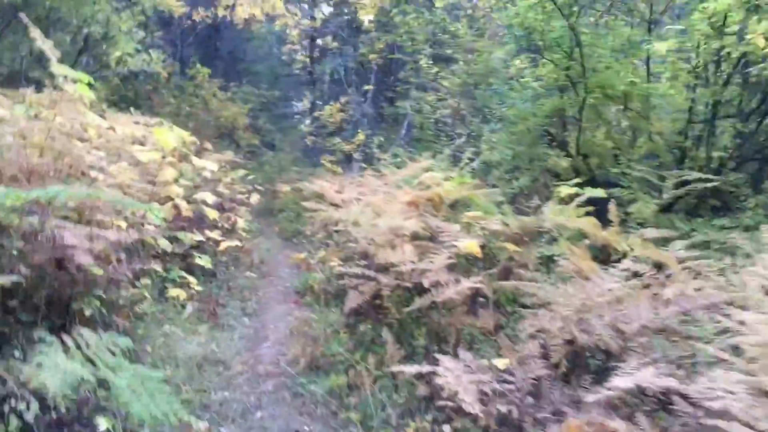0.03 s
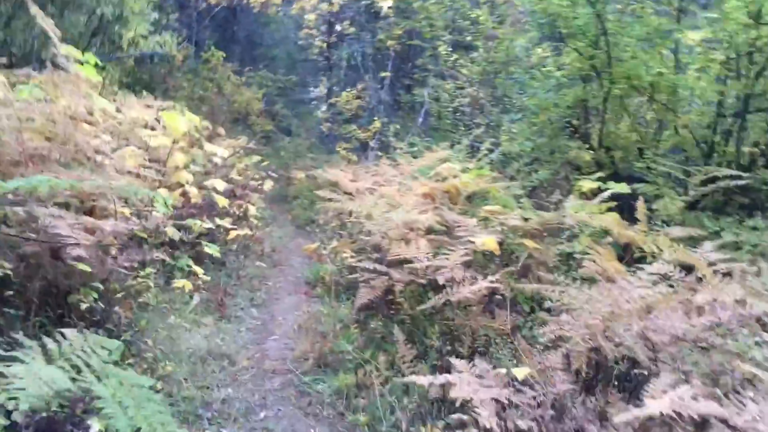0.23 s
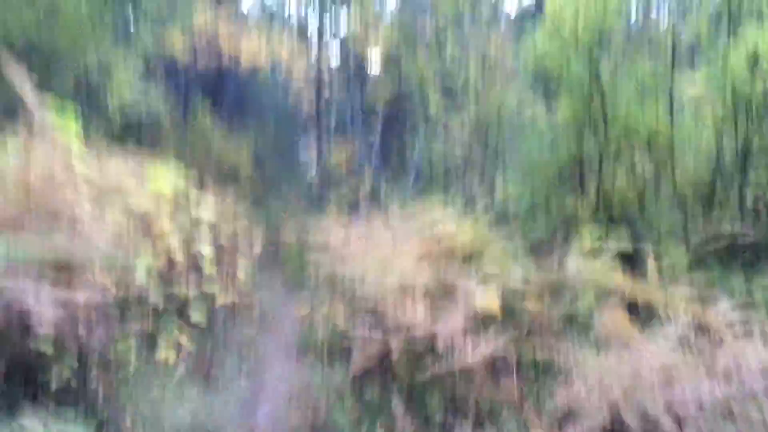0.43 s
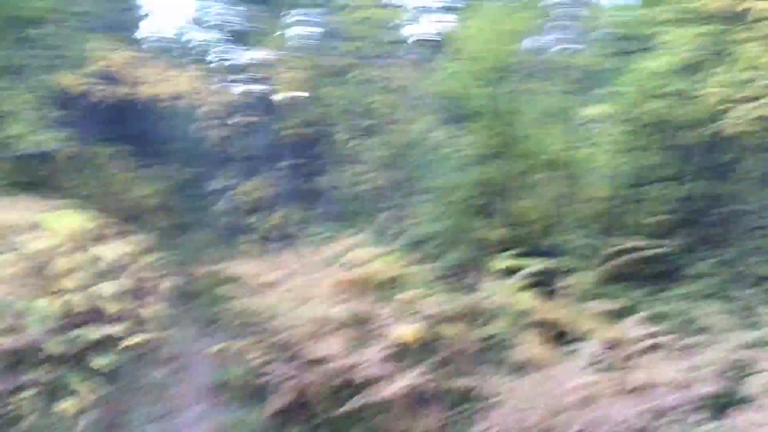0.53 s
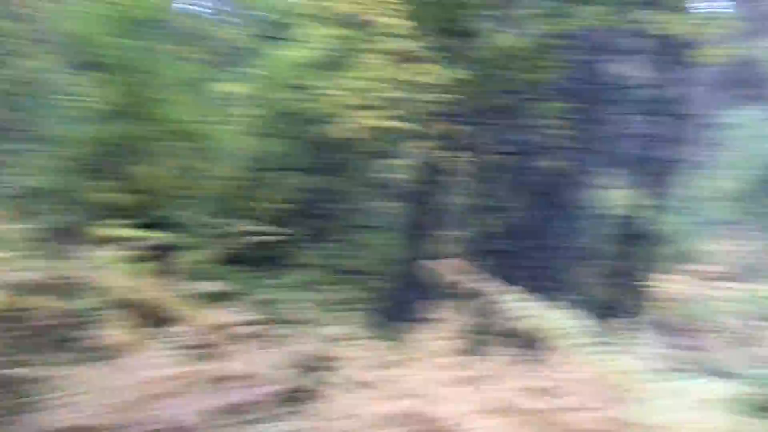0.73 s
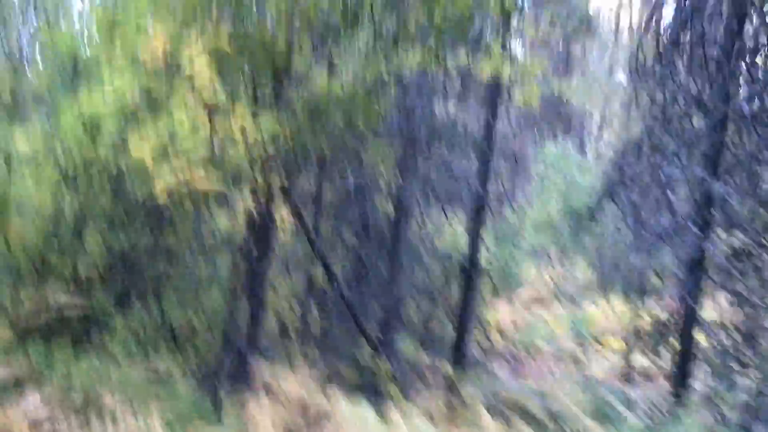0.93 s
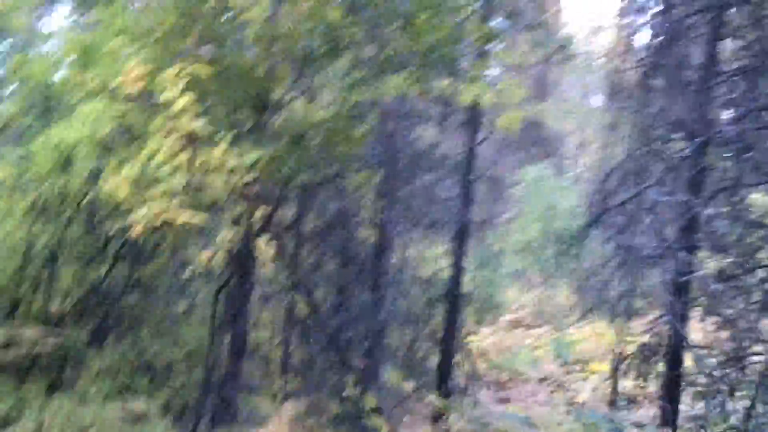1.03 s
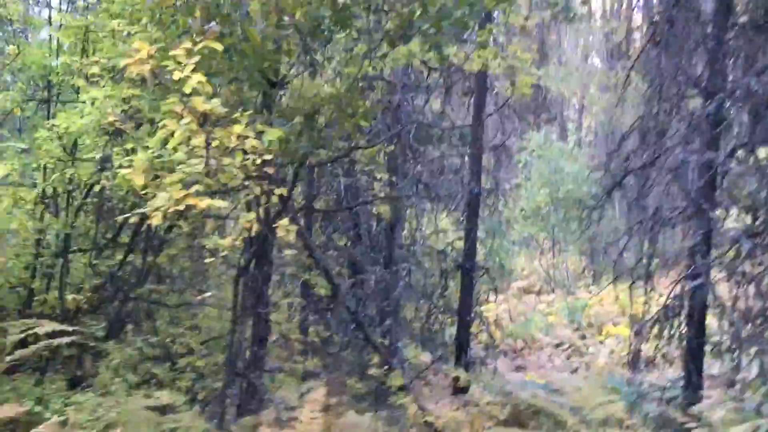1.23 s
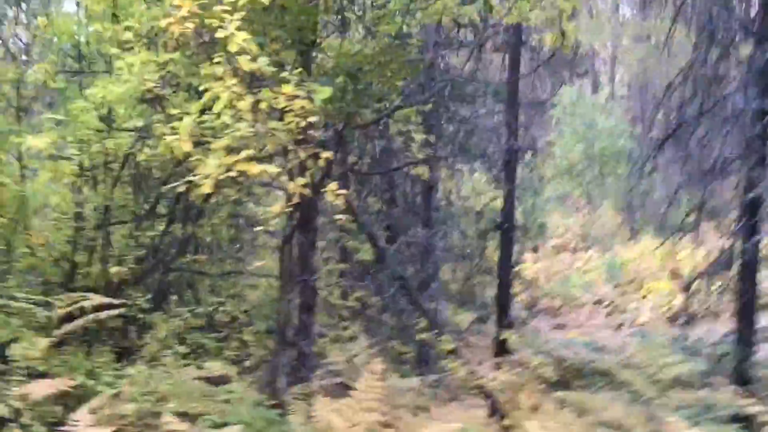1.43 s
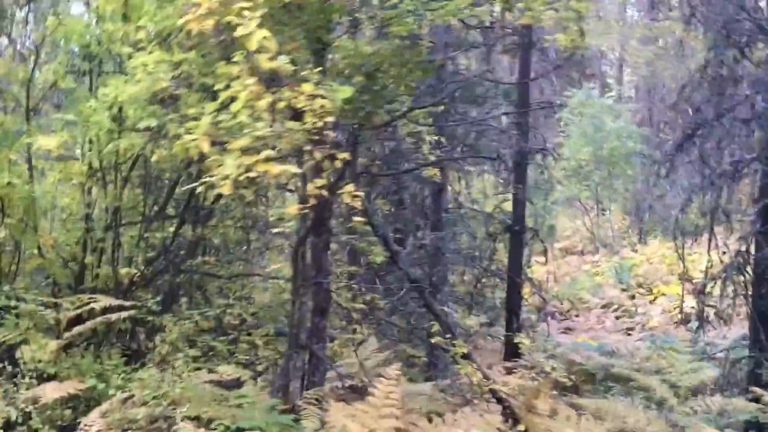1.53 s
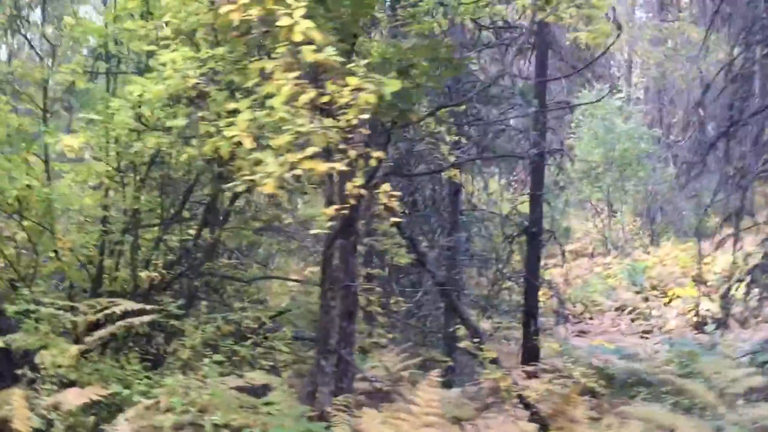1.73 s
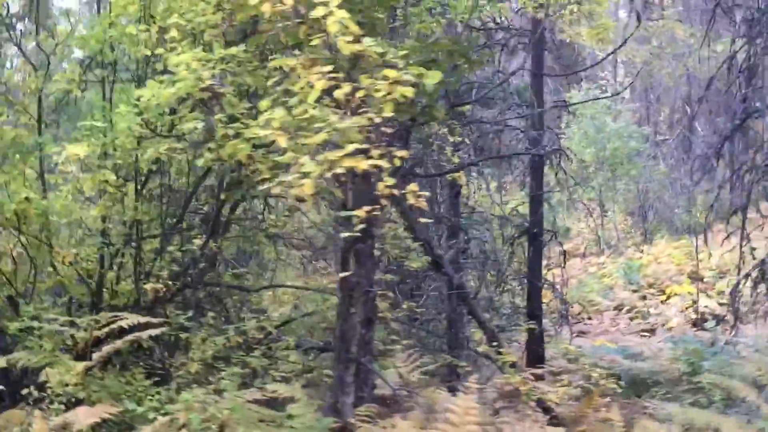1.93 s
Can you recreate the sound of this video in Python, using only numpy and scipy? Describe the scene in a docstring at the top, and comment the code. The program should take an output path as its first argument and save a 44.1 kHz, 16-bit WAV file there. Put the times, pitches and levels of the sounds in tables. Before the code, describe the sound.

A bird takes flight in quiet woods. Dry ferns stir faintly, then at about 0.2 seconds its wings thrash leaves and snap twigs, with dull thumps and a low rumble. Rapid wingbeats, low air pulses with feathery swishes, are strongest from 0.4 to 1.2 seconds, then continue more softly until 2 seconds as the rustling settles. A small bird gives very faint, thin, distant calls near 1 and 1.6 seconds.

```python
"""Dry bracken stirs and twigs snap over quiet forest air and a low rumble. Then a startled bird bursts out
and flies off through the woods, at about 17 wingbeats a second. Each beat pushes a low pulse of air
and a swish of feathers; the wings thrash leaves, snap more twigs and knock on branches.
The shaken plants settle, the tree trunks scatter the sound, and a small bird calls thinly far away."""
import sys
import numpy as np
from scipy import signal
from scipy.fft import rfft, irfft
from scipy.io import wavfile

SR = 44100
rng = np.random.default_rng(int(sys.argv[2]) if len(sys.argv) > 2 else 0)


def unload_wav(signal):
    """Save mono or channel-first audio to the path in sys.argv[1] as 16-bit WAV at rate SR, clipped to [-1, 1]."""
    wavfile.write(
        sys.argv[1],
        SR,
        np.round(np.clip(np.atleast_2d(signal).T, -1, 1) * 32767).astype(np.int16),
    )


N = 88200
TOP_HZ = 15700
STRIKE_ATTACK_S = 0.00034
LEAF_CRACKS_PER_S, STEM_CRACKS_PER_S = 330, 260


def undb(db):
    """Turn decibels into a number to multiply by."""
    return 10 ** (np.asarray(db) / 20)


def clock():
    """The time of every sample, in seconds."""
    return np.arange(N) / SR


def curve(points):
    """A changing volume that follows (time [s], level [dB]) points."""
    return undb(np.interp(clock(), *np.array(points).T))


def unit(x):
    """Scale a sound so that its average level (rms) is 1."""
    return x / np.sqrt(np.mean(x ** 2))


def colour(x, tone):
    """Filter a sound to follow (frequency [Hz], level [dB]) points; its rms comes out as 1."""
    hz, db = np.array(tone).T
    grid_hz = np.maximum(np.fft.rfftfreq(N, 1 / SR), 1)
    gain = undb(np.interp(np.log(grid_hz), np.log(hz), db))
    # folding the cepstrum makes the filter ring only after a click, never before it
    cepstrum = irfft(np.log(gain), N)
    cepstrum[1:N // 2] *= 2
    cepstrum[N // 2 + 1:] = 0
    return unit(irfft(rfft(x) * np.exp(rfft(cepstrum)), N))


def band(x, hz, width, order=1):
    """Keep the frequencies around hz; width is a share of hz."""
    edge = width / 2 + np.sqrt(1 + width ** 2 / 4)
    edges_hz = [hz / edge, min(hz * edge, SR / 2 - 10)]
    return signal.sosfilt(signal.butter(order, edges_hz, "band", fs=SR, output="sos"), x)


def lowpass(x, hz):
    """Soften everything above hz."""
    return signal.sosfilt(signal.butter(2, hz, fs=SR, output="sos"), x)


def burst(start, release_s, length_s=0, attack_s=1 / SR):
    """A volume shape that rises, holds until length_s after its start, then dies away."""
    age = clock() - start
    return np.clip(age / attack_s, 0, 1) * np.exp(-np.maximum(age - length_s, 0) / release_s)


def crackle(cracks_per_s, tone, decay_s=0.0017):
    """Tiny cracks of uneven size, each dying in a moment, over equally strong smooth rubbing."""
    size_db = 3 * np.minimum(rng.exponential(size=N), 3)
    cracks = (rng.random(N) < cracks_per_s / SR) * undb(size_db) ** 2
    power = signal.lfilter([1], [1, -np.exp(-2 / (decay_s * SR))], cracks)
    volume = np.sqrt(power / power.mean() + 1)  # the 1 is the rubbing
    return colour(volume * rng.standard_normal(N), tone)


def forest_air():
    """The quiet, steady hush of the woods."""
    # tone of the air (frequency [Hz], level [dB])
    tone = [(59, -27), (100, 5), (185, -17), (328, -5.5), (452, -14.5), (891, -16), (3120, -53),
            (4980, -37), (6020, -41.5), (14700, -57), (16000, -60)]
    return undb(-67) * colour(rng.standard_normal(N), tone)


def rumble():
    """A deep noise that drops away at first, swells as the bird takes off, then fades."""
    # tone of the rumble (frequency [Hz], level [dB])
    tone = [(20, -37.5), (48, 2.5), (130, -2), (220, -18), (500, -47)]
    # its rise and fall (time [s], level [dB])
    levels = [(0, -41), (.04, -60), (.17, -77), (.25, -53.5), (.48, -44), (.74, -52), (1.15, -54.5),
              (1.25, -65), (2, -71)]
    return curve(levels) * colour(rng.standard_normal(N), tone)


def bracken():
    """Dry ferns close by crackle softly as they stir."""
    # how strongly they stir (time [s], level [dB])
    stirring = [(0, -63.5), (.09, -59), (.17, -67.5), (1.0, -63.5), (1.8, -73.5), (1.9, -67), (2, -68.5)]
    # tone of dry ferns (frequency [Hz], level [dB])
    tone = [(200, -1), (500, -5), (1050, 0), (1800, -1.5), (2800, -10), (5000, -12.5), (12000, -35)]
    return curve(stirring) * crackle(STEM_CRACKS_PER_S, tone)


def twigs():
    """Each twig breaks with a sharp crack, then splinters for a moment."""
    # twigs snapping (time [s], peak level [dB], centre [Hz], width [share of the centre])
    snaps = [(0.075, -40.5, 1020, 0.28), (0.146, -45.5, 1130, 0.18), (.1868, -31.5, 1880, 1.1),
             (.227, -28, 6240, 0.33), (0.2361, -26, 4440, 1.4), (0.2594, -26.5, 2850, 0.73),
             (.262, -44, 7500, 1.8), (.2735, -40, 4500, 1.3), (.2955, -24, 5350, 0.47),
             (0.306, -27, 790, 0.78), (0.35, -32, 2110, 0.86), (0.469, -35, 3320, 0.77),
             (0.514, -32, 6200, 1.3), (0.583, -30.5, 2040, 0.56), (0.6229, -29.5, 1480, 1.4),
             (0.6903, -26.5, 3450, 0.49), (.6985, -26.5, 7500, 2), (0.7529, -24, 8000, 1.6),
             (0.7595, -27, 8000, 2.3), (0.761, -27.5, 8500, 2.2), (0.8231, -30.5, 1300, 1.4),
             (0.8258, -33.5, 3330, 1.5), (1.189, -32.5, 2260, 1.3), (1.269, -45, 1040, 0.81),
             (1.369, -44.5, 3000, 2), (1.38, -43, 2600, 0.73), (1.402, -44.5, 1270, 4.5),
             (1.892, -43.5, 1190, 0.45)]
    out = np.zeros(N)
    for at, db, hz, width in snaps:
        breaking = burst(at, release_s=0.00018)
        splintering = undb(-11) * burst(at, release_s=0.0026)
        crack = band(rng.standard_normal(N) * (breaking + splintering), hz, width)
        crack = lowpass(crack, min(1.7 * hz, TOP_HZ))
        out += undb(db) * crack / np.abs(crack).max()
    return out


def foliage():
    """Leaves and stems crackle when a wing hits them, and go on rustling as they settle."""
    # wings hitting plants (time [s], length [s], leaf level [dB], stem level [dB])
    thrashes = [(0.1865, 0.0022, -48, -54), (0.194, 0.001, -47, -45.5), (.204, 0.02, -42.5, -44),
                (0.225, 0.014, -41.5, -44), (0.259, 0.006, -36, -41), (0.279, 0.043, -36.5, -42),
                (0.31, 0.033, -39.5, -35), (0.341, 0.017, -40, -38.5), (0.408, 0.022, -48.5, -42.5),
                (0.466, 0.0072, -37.5, -40), (0.512, 0.016, -46.5, -47), (0.573, 0.024, -42.5, -42),
                (0.61, 0.02, -44, -44), (0.689, 0.0038, -38.5, -45), (0.7517, .0005, -44.5, -46),
                (0.758, 0.007, -43.5, -41), (0.805, 0.026, -72, -47.5), (0.8625, 0.0018, -47.5, -53.5),
                (1.031, 0.0056, -52.5, -49.5), (1.112, 0.023, -60.5, -57), (1.168, 0.013, -53.5, -52),
                (1.18, 0.0098, -50.5, -48.5), (1.242, 0.057, -60.5, -57), (1.368, 0.023, -55.5, -60.5),
                (1.568, 0.01, -59, -72), (1.85, 0.053, -66.5, -63)]
    # rustle of the shaken plants (time [s], level [dB])
    settling = [(0, -72), (.19, -69.5), (.23, -50.5), (.36, -48), (.5, -50.5), (.7, -53.5), (.9, -58.5),
                (1.0, -62), (1.07, -60.5), (1.3, -67.5), (1.6, -66), (2, -73)]
    # tone of crisp leaves (frequency [Hz], level [dB])
    leaf_tone = [(800, -18.5), (2000, 5.5), (3000, 6), (4600, -2), (5800, 5), (9000, 2), (10500, -1),
                 (15500, -3.5)]
    # duller tone of stems (frequency [Hz], level [dB])
    stem_tone = [(150, 1), (350, -6), (520, -2), (700, -3.5), (1050, 1), (1600, -3.5), (2500, -12),
                 (4000, -10), (12000, -49)]
    leaf_power = curve(settling) ** 2
    stem_power = leaf_power * undb(-1.5) ** 2
    for at, length_s, leaf_db, stem_db in thrashes:
        shape = burst(at, release_s=0.012, length_s=length_s, attack_s=STRIKE_ATTACK_S)
        shape *= burst(at, release_s=0.058)  # each strike is hardest at its start
        leaf_power += (undb(leaf_db) * shape) ** 2
        stem_power += (undb(stem_db) * shape) ** 2
    leaves = np.sqrt(leaf_power) * crackle(LEAF_CRACKS_PER_S, leaf_tone)
    stems = np.sqrt(stem_power) * crackle(STEM_CRACKS_PER_S, stem_tone)
    return leaves + stems


def knocks():
    """Soft wings thump against the bird's body and the undergrowth."""
    # dull blows (time [s], level [dB], centre [Hz], length [s])
    blows = [(0.204, -44.5, 167, 0.019), (0.26, -38.5, 158, 0.0045), (0.319, -37, 800, 0.013),
             (0.308, -33.5, 189, 0.015), (0.304, -40, 267, 0.0142), (0.469, -51, 157, 0.0132),
             (0.516, -46.5, 520, 0.014), (0.62, -44, 483, 0.014), (0.696, -41.5, 414, 0.0037),
             (0.815, -47.5, 273, 0.006), (1.041, -41.5, 385, 0.0025), (1.073, -48, 330, 0.00093),
             (1.488, -50, 328, 0.0011), (1.871, -51.5, 145, 0.0062)]
    out = np.zeros(N)
    for at, db, hz, length_s in blows:
        shape = burst(at, release_s=0.003, length_s=length_s, attack_s=STRIKE_ATTACK_S)
        thump = band(rng.standard_normal(N) * shape, hz, width=0.52, order=2)
        out += undb(db) * unit(thump) * np.sqrt(np.mean(shape ** 2))
    return out


def air_pulse(at, width_s):
    """A wing stroke pushes the air, then sucks it back; the peak is 1."""
    offset = (clock() - at) / width_s
    return -offset * np.exp((1 - offset ** 2) / 2)


def wings(lift_lead_s=0.02, swish_lead_s=0.014, swish_width_s=0.0044):
    """The upstroke and downstroke each make a low pulse of air; feathers swish between the two."""
    # wingbeats (downstroke time [s], air pulse level [dB], swish level [dB])
    beats = [(0.26, -40.5, -52), (0.338, -49, -46.5), (0.403, -49, -53), (0.453, -32, -42),
             (0.51, -39, -49), (0.57, -39.5, -46.5), (.628, -60, -55), (.687, -37.5, -42),
             (0.746, -38.5, -48), (0.809, -57, -57), (0.868, -36, -47), (0.923, -35, -45.5),
             (.981, -38, -58), (1.038, -40.5, -52), (1.095, -38.5, -66), (1.154, -38, -51),
             (1.209, -50, -56), (1.303, -45.5, -64), (1.361, -46, -58.5), (1.507, -43.5, -74),
             (1.567, -47, -65), (1.634, -51.5, -67), (1.692, -41.5, -58.5), (1.753, -43, -67),
             (1.81, -43, -72), (1.871, -43, -64), (1.931, -45.5, -60), (1.990, -44, -70)]
    # tone of the feathers (frequency [Hz], level [dB])
    swish_tone = [(60, -43), (115, -6), (170, 7.5), (270, -15.5), (390, -0.5), (520, -7), (700, -13.5),
                  (1500, -10.5), (6000, -68)]
    pulses, swish_volume = np.zeros(N), np.zeros(N)
    for at, pulse_db, swish_db in beats:
        upstroke = undb(-6) * air_pulse(at - lift_lead_s, width_s=0.004)
        downstroke = air_pulse(at, width_s=0.0037)
        pulses += undb(pulse_db) * (upstroke + downstroke)
        offset = (clock() - at + swish_lead_s) / swish_width_s
        swish_volume += undb(swish_db) * np.exp(-offset ** 2 / 2)
    return pulses, swish_volume * colour(rng.standard_normal(N), swish_tone)


def far_calls(length_s=0.055, rise_hz=1600, blur_hz=400):
    """A small bird sings faint rising notes, which the trees blur into a hoarse lisp."""
    # distant notes (time [s], level [dB], starting pitch [Hz])
    notes = [(1.027, -65, 6170), (1.62, -71, 5700)]
    blur = unit(lowpass(rng.standard_normal(N), blur_hz))
    out = np.zeros(N)
    for at, db, hz in notes:
        progress = np.clip((clock() - at) / length_s, 0, 1)
        swell = np.sqrt(2 * np.abs(np.sin(np.pi * progress)))
        whistle = np.sin(2 * np.pi * np.cumsum(hz + rise_hz * progress) / SR)
        out += undb(db) * swell * blur * whistle
    return out


def woodland(x, gap_s=0.013, fade_60_db_s=0.35, echo_db=-15):
    """Trunks and undergrowth scatter the sound, adding a short, soft echo."""
    # tone of the echo (frequency [Hz], level [dB])
    tone = [(60, -7.5), (400, 3.5), (6000, -4.5), (16000, 3.5)]
    tail = colour(rng.standard_normal(N), tone)
    tail *= burst(gap_s, release_s=fade_60_db_s / np.log(1000), attack_s=gap_s)
    tail /= np.sqrt(np.sum(tail ** 2))
    return x + undb(echo_db) * signal.fftconvolve(x, tail)[:N]


def scene():
    """Birds and plants echo among the trees; the air pulses, hush and rumble have no echo."""
    pulses, swish = wings()
    among_trees = woodland(bracken() + twigs() + foliage() + knocks() + swish + far_calls())
    return (forest_air() + rumble() + pulses + among_trees)[None]


def record(dry):
    """The microphone loses the deepest bass, and the highest treble is cut steeply."""
    bass_cut = signal.butter(3, 39.5, "high", fs=SR, output="sos")
    treble_cut = signal.ellip(10, 0.2, 80, TOP_HZ, fs=SR, output="sos")
    thinned = signal.sosfiltfilt(bass_cut, dry, padtype="even")
    return signal.sosfilt(treble_cut, thinned)


dry = scene()
out = record(dry)
unload_wav(out)
```